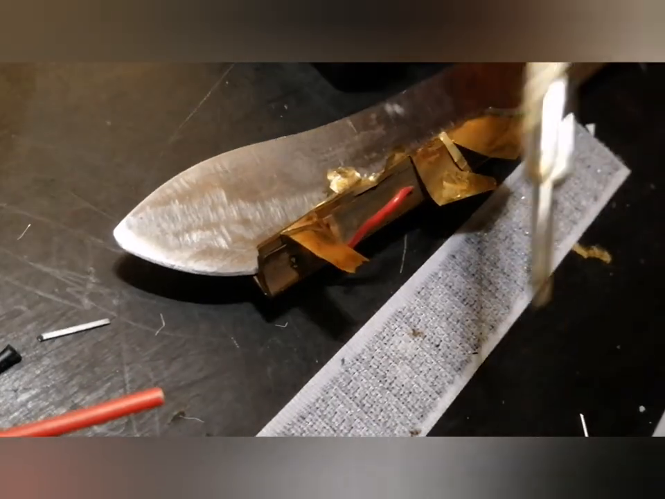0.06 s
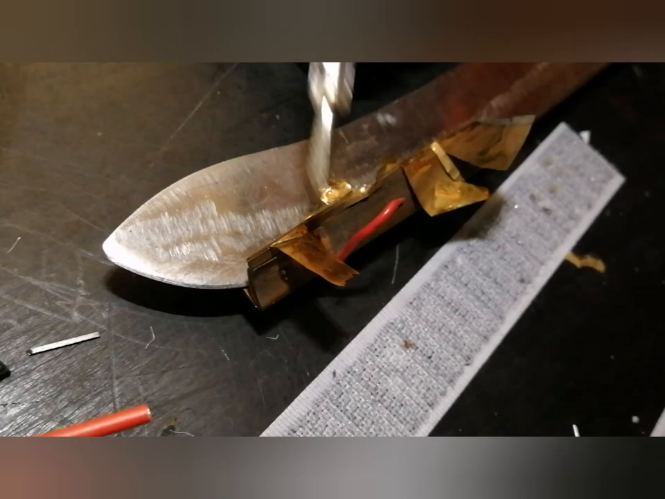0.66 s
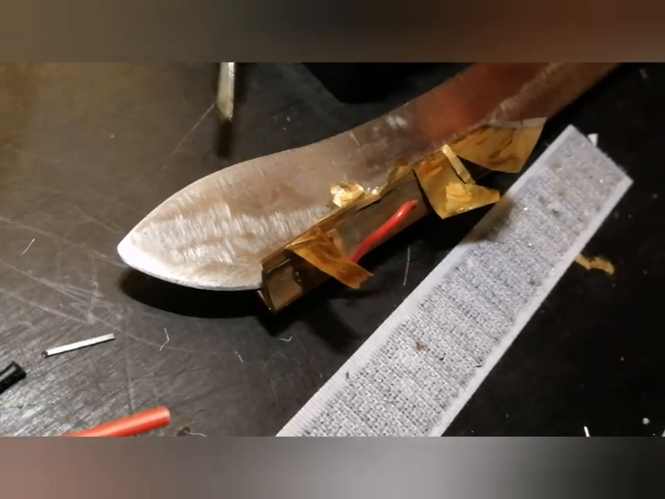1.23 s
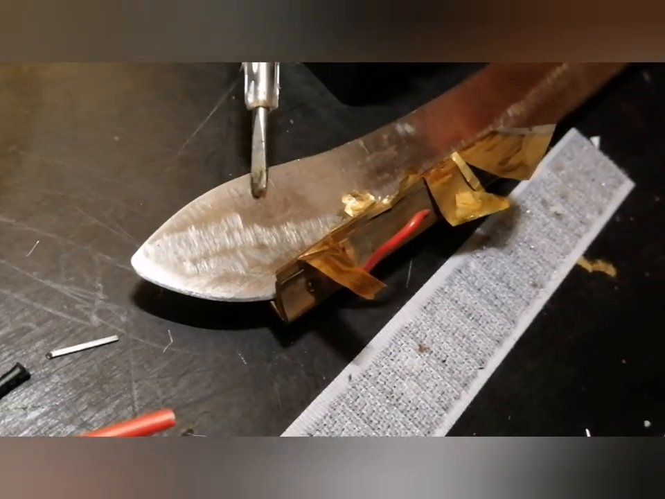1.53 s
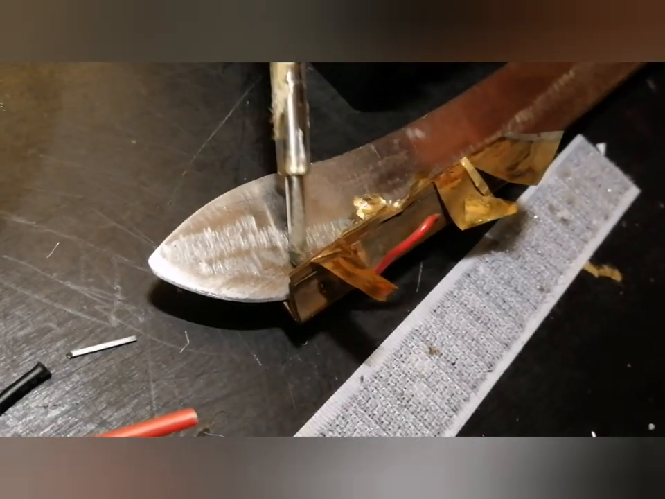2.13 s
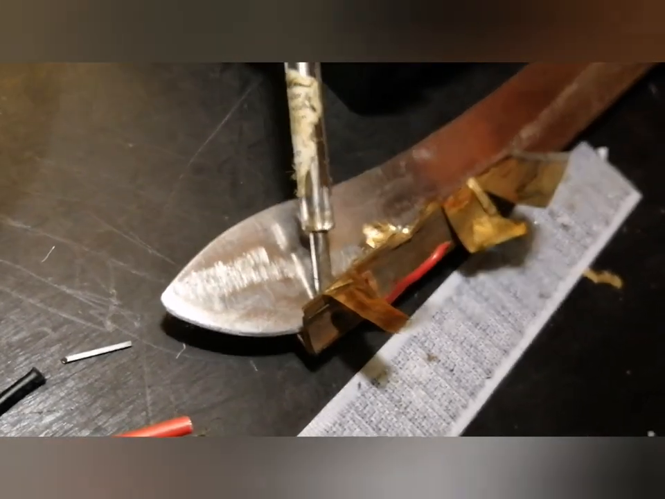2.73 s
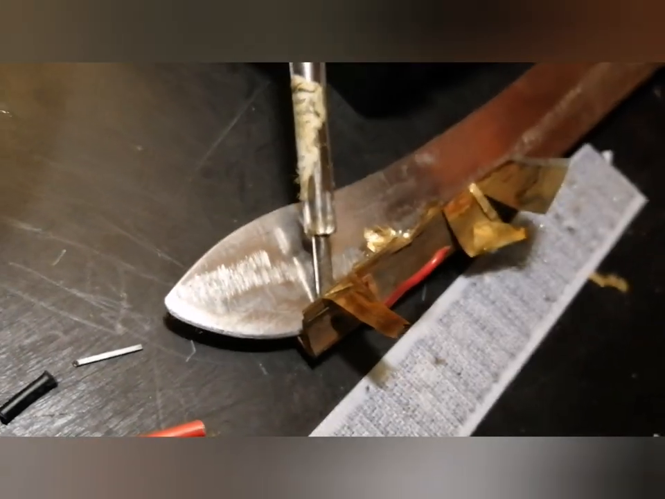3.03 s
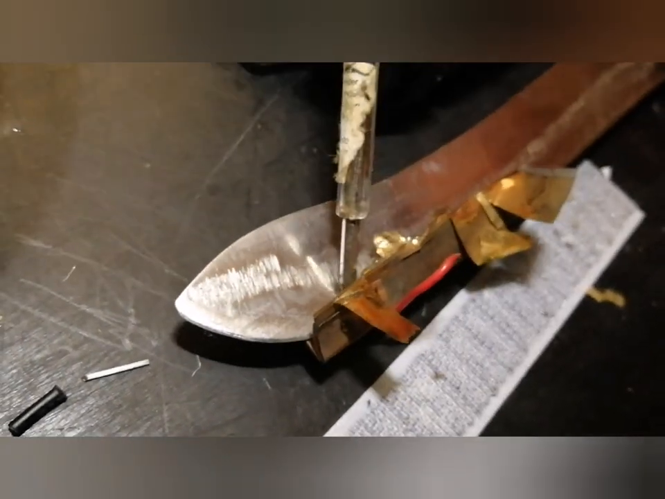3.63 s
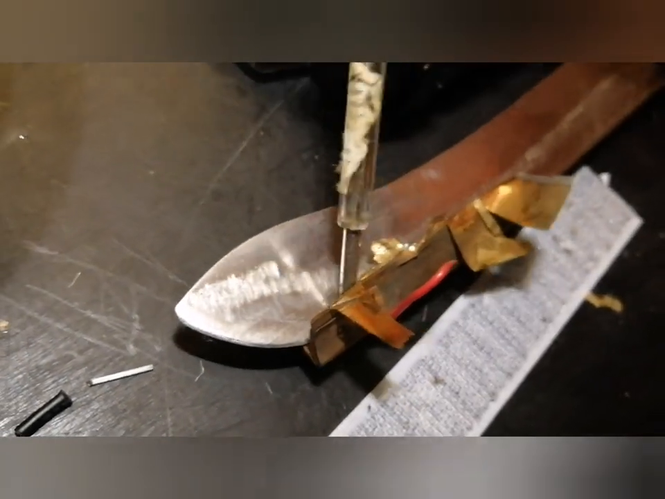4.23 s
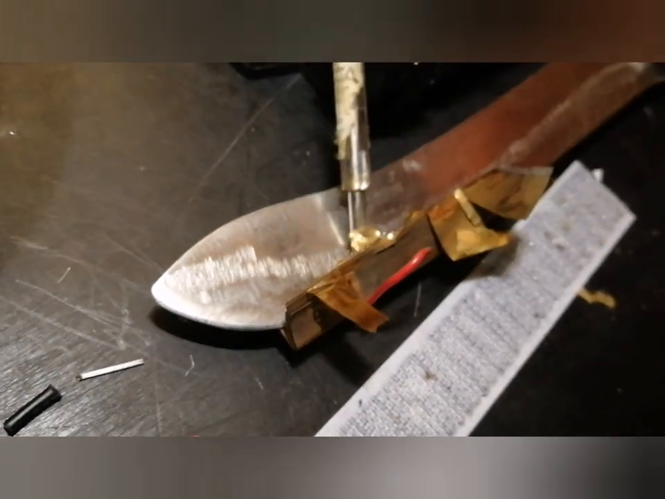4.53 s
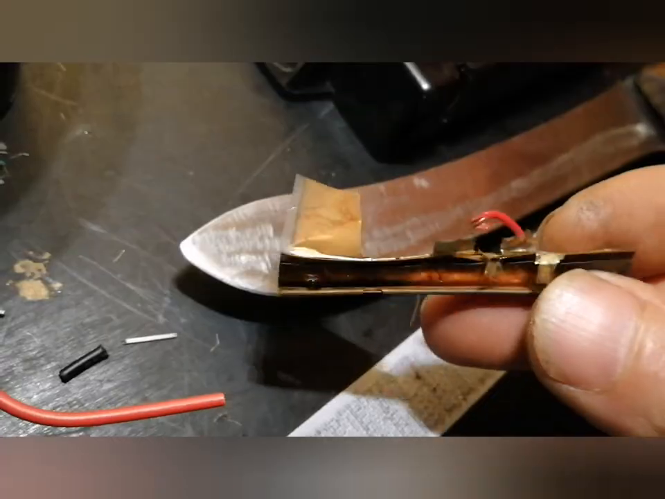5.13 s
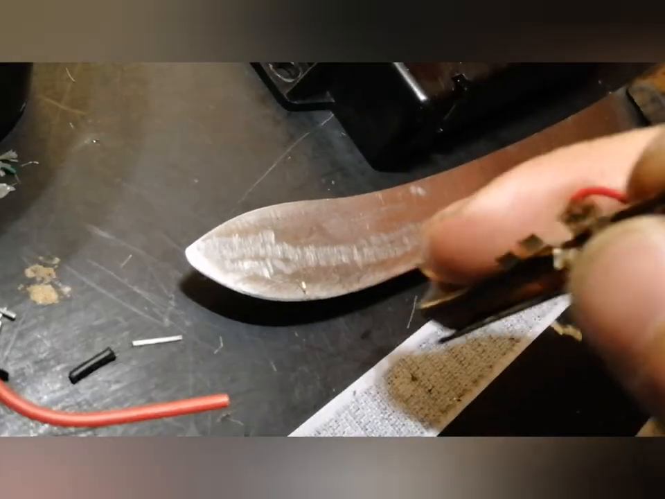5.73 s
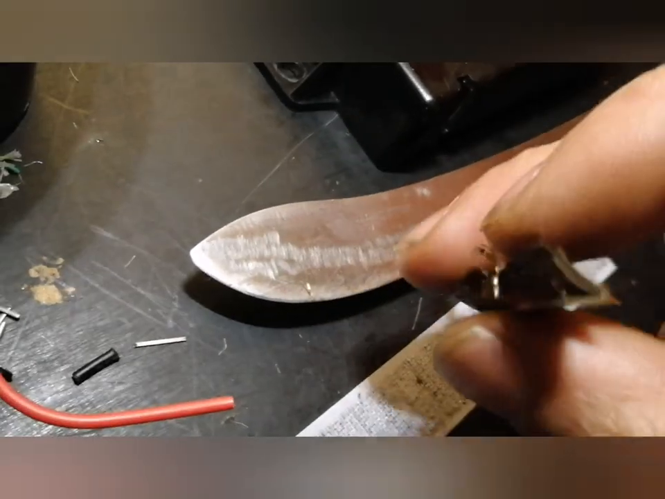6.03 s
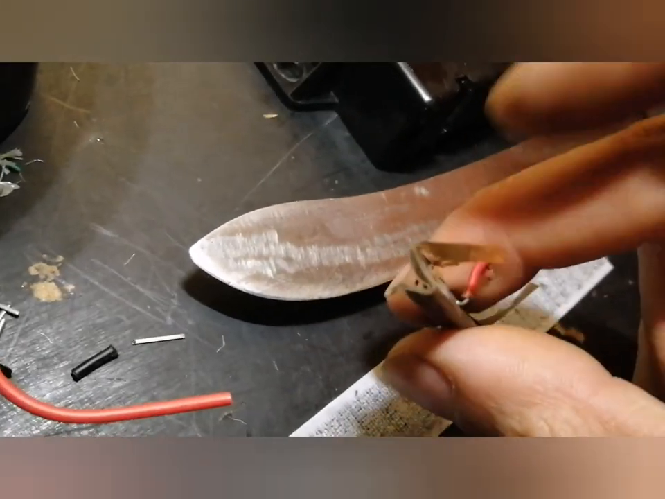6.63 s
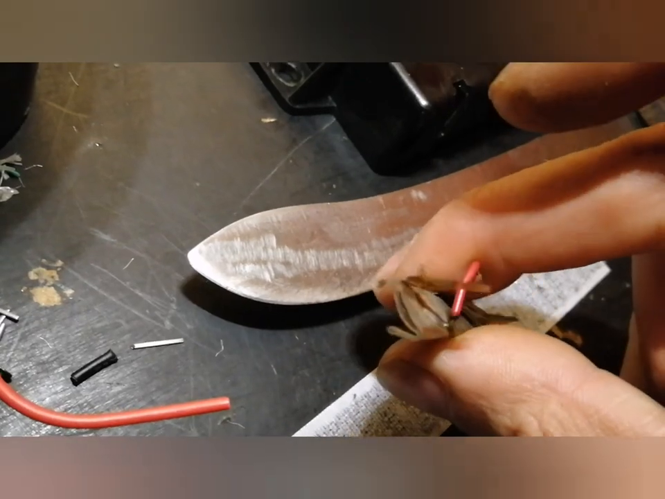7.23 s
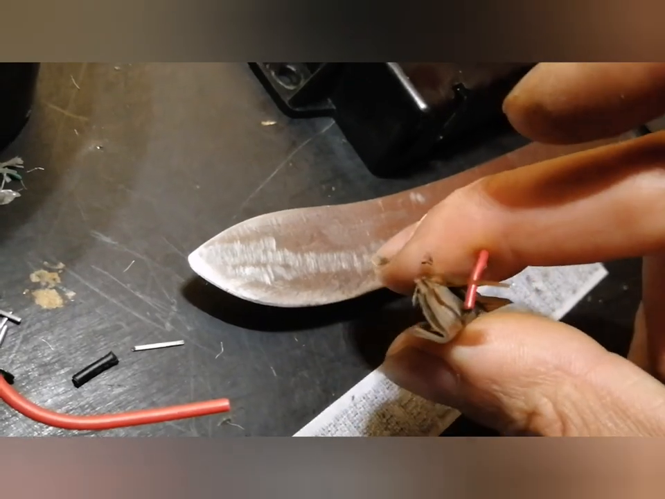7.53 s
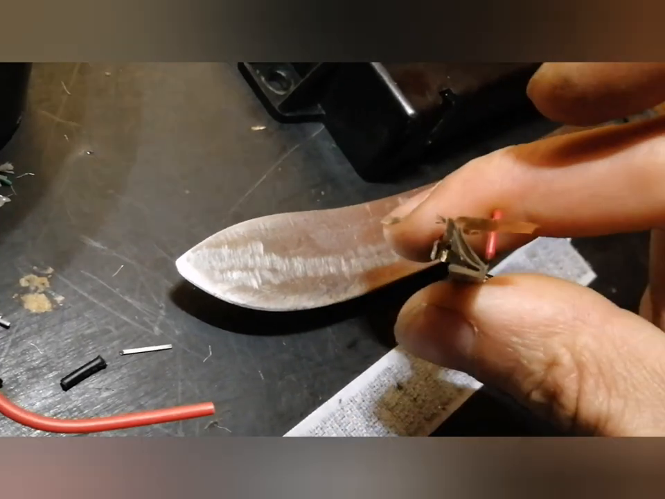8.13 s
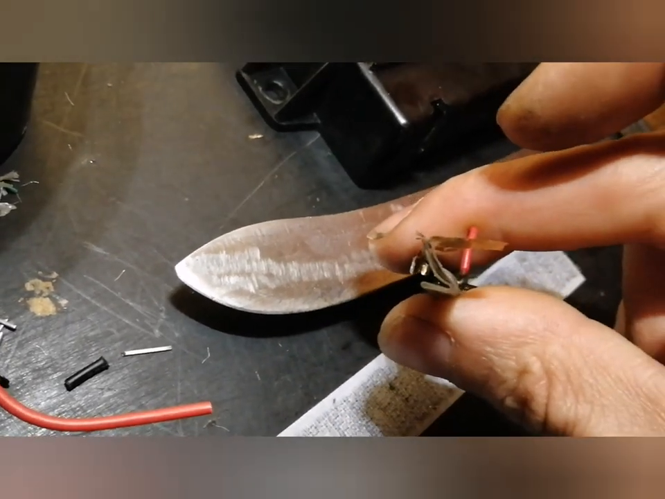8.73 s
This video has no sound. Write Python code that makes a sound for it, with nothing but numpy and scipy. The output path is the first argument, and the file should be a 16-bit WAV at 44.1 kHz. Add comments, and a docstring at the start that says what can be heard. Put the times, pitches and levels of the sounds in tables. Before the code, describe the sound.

After a faint finger rub, a steel blade knocks lightly several times on a workbench. A small screwdriver clicks against the blade and makes short, thin scrapes over steel and foil, and the work knocks again. Fingers then take up a foil-wrapped part, which crinkles and snaps before easing into soft rubs and scattered ticks. The sound is close and leans left, in a quiet room.

```python
"""A faint rub of fingers in a quiet room, then close handwork at a bench: pieces rock and knock on the
bench top while a small screwdriver scrapes thin foil against a steel blade, slips off and clicks on the
metal. Fingers then pick up the foil-wrapped part and press it: creases tick as they pop over, the foil
crinkles and skin sticks and slips. The work lies near the left microphone port; the right one is shaded."""
import sys
import numpy as np
from scipy import signal
from scipy.fft import rfft, irfft, next_fast_len
from scipy.io import wavfile
from scipy.ndimage import map_coordinates

SR = 44100
rng = np.random.default_rng(int(sys.argv[2]) if len(sys.argv) > 2 else 0)


def master(y):
    """Save y as 16-bit WAV."""
    cut = np.clip(np.atleast_2d(y).T, -1, 1)
    pcm = np.round(cut * 32767)  # scale
    wavfile.write(sys.argv[1], SR, pcm.astype(np.int16))


N = 391768
T = np.arange(SR // 3) / SR  # time within one event

# ringing modes of the bench top and of the steel blade: pitch_hz, gain_db, t60_s
BENCH_MODES = [(164.5, -6, 0.24), (202, -9, 0.19), (238.2, -3, 0.17), (277.4, 7.5, 0.044),
               (318, -0.5, 0.11)]
BLADE_MODES = [(458, -1, 0.05), (508, -6.5, 0.087), (670, -0.5, 0.069), (1257, -2.5, 0.054),
               (1494.5, 4, 0.07), (1538, -5.5, 0.059), (1657, -16, 0.078)]
# tone of a woody knock and of the foil's fizz: freq_hz, gain_db
KNOCK_EQ = [(100, -32), (350, -13), (470, 2.5), (580, -11.5), (690, 1.5), (850, 0.5), (1100, 7.5),
            (1530, 6), (1900, -6.5), (2900, -11.5), (4200, -23), (6500, -23), (8700, -19), (16000, -68)]
FIZZ_EQ = [(2000, -37), (6000, -17), (11000, 3.5), (13000, -3.5), (16000, -11.5)]
# swells of the foil's rustle in the fingers: time_s, level_db
HANDLING = [(5.05, -82.5), (5.16, -67), (5.35, -75.5), (5.52, -68), (5.68, -72.5), (5.98, -56.5),
            (6.12, -74), (6.29, -74.5), (6.96, -83), (7.87, -76.5), (8.49, -81.5), (8.88, -70)]


def amp(db):
    """Decibels to gain."""
    return 10 ** (np.asarray(db) / 20)


def unit(x, span_s=None):
    """x at rms 1, over all of it or as if its energy fell in span_s."""
    return x / np.sqrt(np.sum(x ** 2) / (span_s * SR if span_s else len(x)) + 1e-20)


def along(points, hz):
    """Read a (freq_hz, value) curve on a log frequency axis."""
    freqs, values = np.transpose(points)
    return np.interp(np.log(hz + 1), np.log(freqs + 1), values)


def fade(t, t60):
    """Exponential decay, 60 dB down at t60."""
    return np.exp(-np.log(1000) * t / t60)


def swell(rise, t60):
    """A straight rise, then a decay."""
    return np.minimum(T / rise, 1) * fade(np.maximum(T - rise, 0), t60)


def wobble(size, knots_per_s):
    """A smooth random curve."""
    knots = rng.standard_normal(int(size * knots_per_s / SR) + 4)
    return map_coordinates(knots, [np.arange(size) * knots_per_s / SR])


def add(track, start_s, x):
    """Mix x into the track."""
    part = track[round(start_s * SR):][:len(x)]
    part += x[:len(part)]


def colour(x, eq):
    """Minimum-phase EQ through (freq_hz, gain_db) points."""
    size = 2 * next_fast_len(x.shape[-1] // 2 + len(T) // 4)
    cepstrum = irfft(np.log(amp(along(eq, np.fft.rfftfreq(size, 1 / SR)))))
    cepstrum[1:size // 2] *= 2
    cepstrum[size // 2 + 1:] = 0
    return irfft(rfft(x, size) * np.exp(rfft(cepstrum)), size)[..., :x.shape[-1]]


def resonate(x, peaks):
    """x through a body's (pitch_hz, width_hz, gain_db) resonances."""
    size = next_fast_len(len(x) + len(T))
    hz = np.fft.rfftfreq(size, 1 / SR)
    body = sum((-1) ** k * amp(db) * 1j * hz * width / (pitch ** 2 - hz ** 2 + 1j * hz * width)
               for k, (pitch, width, db) in enumerate(peaks))
    return irfft(rfft(x, size) * body, size)[:len(x)]


def ring(modes, attack):
    """Damped modes, at slightly new strengths and pitches for each blow."""
    hz, db, t60 = np.transpose(modes)[:, :, None]
    strength, detune, phase = rng.standard_normal((3, len(modes), 1))
    waves = amp(db + 2 * strength) * np.sin(2 * np.pi * (hz * (1 + .005 * detune) * T + phase))
    return np.sum(fade(T, t60) * waves, axis=0) * (1 - np.exp(-T / attack))


def burst(attack, t60):
    """A brief dying puff of noise."""
    return rng.standard_normal(len(T)) * (1 - np.exp(-T / attack)) * fade(T, t60)


def grit(size, slips_per_s, spread_db, hiss):
    """Friction: tiny slips of uneven strength over a smooth hiss."""
    slips = (rng.random(size) < slips_per_s / SR) * rng.choice([-1, 1], size)
    strength = amp(spread_db * rng.uniform(-1, 1, size))
    return unit(unit(slips * strength) + hiss * rng.standard_normal(size))


def hush(level_db=-73):
    """Faint room hiss, centred in the bass and wider above."""
    hiss_eq = [(40, -24), (100, -18), (170, -19), (250, -22), (320, -20), (430, -26), (1200, -26),
               (5000, -30), (8800, -29.5), (11000, -33.5), (16000, -34.5)]  # tone of the hiss: freq_hz, gain_db
    likeness = [(60, 1), (300, 0.6), (600, 0), (1500, 0.44)]  # how alike the ports hear it: freq_hz, correlation
    balance = [(300, 1.5), (800, 0.5), (2000, 3), (6000, 0), (7400, 2.5), (8500, -2), (9700, 0.5),
               (11000, 0)]  # its lean to the left: freq_hz, left_minus_right_db
    hz = np.fft.rfftfreq(N, 1 / SR)
    mid, side = rfft(rng.standard_normal((2, N))) * amp(along(hiss_eq, hz))
    side *= np.tan(np.arccos(np.clip(along(likeness, hz), 0, 1)) / 2)
    lean = amp(along(balance, hz) / 2)
    pair = irfft(np.array([(mid + side) * lean, (mid - side) / lean]), N)
    return amp(level_db) * pair / pair.std()


def rumble(gain_db=3):
    """The room's deep rumble drifts slowly and is the same at both ports."""
    drift = [(0.0, -76), (3.26, -73.5), (4.1, -79), (8.66, -77), (8.88, -80)]  # rise and fall of the rumble: time_s, level_db
    rumble_eq = [(12, -15.5), (25, -2), (37, -8), (50, 2), (70, -4), (100, -20.5), (200, -24.5),
                 (600, -103)]  # its tone: freq_hz, gain_db
    drift_db = np.interp(np.arange(N) / SR, *np.transpose(drift))
    return amp(gain_db + drift_db) * unit(colour(rng.standard_normal(N), rumble_eq))


def fingers(rustle_db=1, crinkle_db=2, clump_db=3):
    """Skin sticks and slips on the part, duller and hollower with more grip; foil crinkles in clumps."""
    # finger slides: start_s, rise_s, t60_s, level_db, grip (0 brushing foil, 1 pressing on the body)
    rubs = [(.03, 0.023, 0.98, -61, 0.46), (5.264, 0.038, .02, -54, 0.075), (5.651, 0.016, .43, -54.5, .3),
            (5.855, 0.058, .11, -48, 0), (5.905, .008, 0.13, -32, 0.034), (5.927, 0.0066, 0.2, -38.5, 0.94),
            (6.103, 0.023, 0.089, -42.5, 0.93), (6.717, .01, 0.088, -67.5, 1),
            (6.883, 0.0032, 0.16, -65, 0.86), (7.312, 0.0041, 0.1, -55.5, 0.52),
            (7.441, 0.007, 0.61, -58.5, 0.73), (7.679, .03, 0.46, -65.5, 0.78),
            (7.862, 0.0067, 0.95, -63, 0.92), (8.167, 0.004, 0.14, -55, 0.45)]
    held_body = [(373, 48, 4.5), (558, 42, 1), (1250, 133, 8.5), (1680, 280, -3), (2350, 540, 2.5),
                 (3070, 320, 6), (3830, 300, -2.5), (4370, 67, 3), (6250, 320, -31)]  # resonances of the held part: pitch_hz, width_hz, gain_db
    crinkle_eq = [(500, -52.5), (2500, -12.5), (6500, -19), (7500, -9), (8200, -6), (9500, -3.5),
                  (10500, -14.5), (12000, -26), (16000, -32)]  # tone of rustling foil: freq_hz, gain_db
    out = np.zeros(N)
    for start, rise, t60, db, grip in rubs:
        slide = swell(rise, t60)
        slips = slide * grit(len(T), slips_per_s=1200, spread_db=10, hiss=.5)
        rustle = amp(rustle_db) * unit(colour(slips, crinkle_eq))
        body = amp(-19 + 23 * grip) * unit(resonate(slips, held_body))
        fizz = amp(3 - 34 * grip) * unit(colour(slips, FIZZ_EQ))
        add(out, start, slide.std() * amp(db) * (rustle + body + fizz))
    crinkle = grit(N, slips_per_s=500, spread_db=12, hiss=.8)
    crinkle *= amp(clump_db * wobble(N, knots_per_s=45))
    return out + amp(crinkle_db + handling_db(np.arange(N) / SR)) * unit(colour(crinkle, crinkle_eq))


def handling_db(time_s):
    """How loudly the foil rustles in the fingers; silent before they take it."""
    return np.interp(time_s, *np.transpose(HANDLING), left=-120)


def knocks(hard_db=-36, blade_db=-6, rock_s=.009, rock_db=-8, thud_db=-46, skid_db=-20.5):
    """The work drops on the bench, rocks onto its other edge and skids; soft knocks are dull thuds."""
    drops = [(1.2664, -36.5), (1.302, -34), (1.351, -51), (1.398, -52), (1.412, -42), (1.4251, -36),
             (1.5407, -34), (2.463, -66), (2.584, -66), (3.7044, -53.5), (3.811, -64.5), (4.695, -35),
             (4.7187, -47.5), (4.771, -53), (4.7934, -41.5), (4.856, -57), (4.962, -67), (7.263, -64)]  # the work meets the bench: start_s, level_db
    out = np.zeros(N)
    for start, db in drops:
        force_db = db - hard_db
        contact = unit(burst(attack=0.00055, t60=0.029))
        contact[0] += 0.68 * np.sqrt(len(T))  # the first hard touch
        add(contact, rock_s, amp(rock_db) * unit(burst(attack=0.00071, t60=0.023)))
        body = unit(colour(contact, KNOCK_EQ)) + amp(blade_db) * unit(ring(BLADE_MODES, attack=0.0007))
        body = colour(body, [(800, 0), (2000, 0.33 * force_db)])  # less force, less treble
        add(out, start, amp(db) * unit(body, 0.023))
        thud = ring(BENCH_MODES, attack=0.0026)
        add(out, start, amp(thud_db + 0.64 * force_db) * unit(thud, 0.015))
        skid = swell(rise=0.011, t60=0.22) * grit(len(T), slips_per_s=300, spread_db=12, hiss=.4)
        add(out, start, amp(db + skid_db) * unit(colour(skid, KNOCK_EQ), 0.023))
    return out


def taps(hard_db=-28, rebound_s=0.0086, shaft_db=-6, wood_db=-3, note_db=-44.5, bench_db=-8):
    """The tip clicks on steel and rebounds once; a harder tap rebounds more and makes the blade sing."""
    strikes = [(1.4175, -30.5, -45), (2.2431, -34.5, -43.5), (2.7028, -49, -56.5), (3.2713, -42.5, -46.5),
               (3.4922, -46, -52), (3.5203, -41, -49.5), (3.6196, -26.5, -45.5), (3.8523, -39.5, -48.5),
               (4.3124, -26.5, -45.5), (4.6061, -41, -78)]  # the tip hits the blade: start_s, click_db, clack_db
    click_eq = [(300, -42), (2000, -22), (2700, -20.5), (3200, -6), (3700, -13.5), (4200, -10.5),
                (6000, -7.5), (7300, -4.5), (8400, 3.5), (9600, 0.5), (10800, -8.5), (14000, -16),
                (16000, -21)]  # tone of steel on steel: freq_hz, gain_db
    # modes of the screwdriver shaft, and the blade's singing note: pitch_hz, gain_db, t60_s
    shaft_modes = [(4780, -10.5, 0.049), (5020, 4.5, 0.02), (6435, 4.5, 0.048), (6660, 1, 0.056),
                   (6600, -6.5, 0.033), (9660, -4, 0.017), (9050, 4.5, 0.026)]
    blade_note = [(1128, 0, 0.072)]
    out = np.zeros(N)
    for start, click_db, clack_db in strikes:
        force_db = click_db - hard_db
        contact = burst(attack=0.00087, t60=0.024)
        add(contact, rebound_s, amp(-5 + 0.27 * force_db) * burst(attack=0.00015, t60=0.014))
        click = unit(colour(contact, click_eq)) + amp(shaft_db) * unit(ring(shaft_modes, attack=0.00051))
        clack = unit(ring(BLADE_MODES, attack=0.0025)) + amp(wood_db) * unit(colour(contact, KNOCK_EQ))
        add(out, start, amp(click_db) * unit(click, 0.021) + amp(clack_db) * unit(clack, 0.024))
        add(out, start, amp(note_db + 1.53 * force_db) * unit(ring(blade_note, attack=0.012), 0.043))
        add(out, start, amp(clack_db + bench_db) * unit(ring(BENCH_MODES, attack=0.0068), 0.026))
    return out


def scrapes(uneven_db=2, blade_db=-5, fizz_db=-19.5):
    """The tip drags with uneven pressure: on steel it rasps and sings, in foil it thins to a fizz."""
    # strokes of the tip: start_s, end_s, level_db, bite (0 gliding on steel, 1 dragging foil)
    strokes = [(1.58, 1.636, -49.5, 0.2), (2.308, 2.376, -57.5, 0), (3.121, 3.165, -66.5, 0.1),
               (3.2, 3.286, -57, 0), (3.422, 3.473, -53.5, 0), (3.596, 3.617, -56.5, 1),
               (4.277, 4.336, -51.5, 0.32), (4.345, 4.45, -55, 0.46), (4.455, 4.573, -55, 0.88),
               (4.593, 4.642, -51.5, 0.44), (4.643, 4.775, -60.5, 0.47), (4.793, 4.855, -54, 0)]
    # resonances of the bright rasp and of the blade under the tip: pitch_hz, width_hz, gain_db
    rasp_peaks = [(3150, 320, -7), (3900, 500, -6.5), (4930, 710, -2.5), (6240, 200, 4.5), (7070, 800, 3.5),
                  (8040, 1530, 4), (9360, 960, 6.5)]
    blade_peaks = [(200, 92, -9), (453, 86, -3.5), (773, 54, -4), (1134, 35, 7), (1506, 42, 4.5),
                   (1700, 97, -6), (2990, 115, -10)]
    out = np.zeros(N)
    for start, end, db, bite in strokes:
        length = end - start
        arch = np.sqrt(np.abs(np.sin(np.pi * np.minimum(T / length, 1))))
        pressure = arch * amp(uneven_db * wobble(len(T), knots_per_s=70.5))
        slips = pressure * grit(len(T), slips_per_s=2000, spread_db=12, hiss=.8)
        rasp = colour(resonate(slips, rasp_peaks), [(5000, -4 * bite), (7000, 0)])
        add(out, start, amp(db) * unit(rasp, length))
        add(out, start, amp(db + blade_db - 14.5 * bite) * unit(resonate(slips, blade_peaks), length))
        add(out, start, amp(db + fizz_db + 24 * bite) * unit(colour(slips, FIZZ_EQ), length))
    return out


def bumps():
    """Soft bumps on the bench: one low dying tone under a brief contact."""
    blows = [(2.83, -64, 0.065, 156, -80), (3.281, -48, 0.15, 168, -44.5), (6.169, -56.5, 0.074, 46.5, -67),
             (8.519, -43, 0.012, 125, -60)]  # each bump: start_s, tone_db, t60_s, pitch_hz, contact_db
    out = np.zeros(N)
    for start, tone_db, t60, hz, contact_db in blows:
        add(out, start, amp(tone_db) * 2 * np.sin(2 * np.pi * hz * T) * fade(T, t60))
        contact = colour(burst(attack=0.00023, t60=0.0027), KNOCK_EQ)
        add(out, start, amp(contact_db) * unit(contact, 0.0096))
    return out


def crease(ping_db, snap_db, pitch_hz=9230, scatter=0.026, width_hz=1000):
    """A foil crease takes about a millisecond to pop over and pings at its own pitch."""
    snap_eq = [(200, -31), (1200, -15), (2500, -11), (5000, -1.5), (7000, 2.5), (11000, 3), (14000, -1.5),
               (16000, -9.5)]  # tone of the pop: freq_hz, gain_db
    port_eq = [(3000, -16), (6500, -6.5), (7800, -2), (9800, -5), (11000, -8), (16000, -20)]  # the treble band that the left port favours: freq_hz, gain_db
    give = np.minimum(T / .001, 1) ** 2
    pop = colour(give * burst(attack=0.00041, t60=0.02), snap_eq)
    ping_hz = pitch_hz * (1 + scatter * rng.standard_normal())
    ping = colour(resonate(pop, [(ping_hz, width_hz, 0)]), port_eq)
    return amp(ping_db) * unit(ping, 0.0035) + amp(snap_db) * unit(pop, 0.0035)


def ticks(faint_per_s=10, over_rustle_db=14.5, spread_db=3.5):
    """Loud creases, and small ones that give at chance moments while the foil is handled."""
    loud_creases = [(4.4861, -46, -34), (4.56, -24, -34.5), (4.718, -32.5, -32.5), (4.862, -44, -51),
                    (5.138, -46.5, -60), (5.161, -49, -45), (5.184, -46.5, -51), (5.238, -53, -50.5),
                    (5.306, -36, -54), (5.512, -42.5, -50), (5.524, -37.5, -42), (5.589, -47, -54),
                    (5.618, -43, -48), (5.631, -32, -38), (5.811, -36, -47), (5.816, -31, -50),
                    (5.834, -24.5, -37.5), (5.914, -20, -34.5), (5.928, -27, -31), (6.123, -42, -57),
                    (6.38, -41.5, -50.5), (6.827, -68, -55), (7.437, -39.5, -49), (7.67, -35, -42),
                    (8.414, -54, -45.5), (8.788, -66, -49.5)]  # snaps in the foil: start_s, ping_db, snap_db
    out = np.zeros(N)
    for start, ping_db, snap_db in loud_creases:
        add(out, start, crease(ping_db, snap_db - 2))
    for slot in np.arange(HANDLING[0][0], HANDLING[-1][0], 1 / faint_per_s):
        start = slot + rng.random() / faint_per_s
        db = handling_db(start) + over_rustle_db + spread_db * rng.standard_normal()
        add(out, start, crease(db, db - 1))
    return out


def room(x, onset_s=0.0034):
    """A short diffuse tail, different at each port."""
    decay = [(150, 0.32), (1000, 0.18), (8000, 0.13), (16000, 0.081)]  # reverb time: freq_hz, t60_s
    hz, t, bands = signal.stft(rng.standard_normal((2, len(T))), SR, nperseg=256)
    _, tail = signal.istft(bands * fade(t, along(decay, hz)[:, None]), SR, nperseg=256)
    tail = tail[:, :len(T)] * np.minimum(T / onset_s, 1)
    return signal.fftconvolve(x[None], tail / np.linalg.norm(tail[0]), axes=1)[:, :N]


def far_port(x, delay_s):
    """The right port hears the bass directly, the treble also scattered off things on the bench."""
    scatter = unit(burst(attack=0.00097, t60=0.056), 1 / SR)
    treble = colour(x, [(300, -24), (1200, -9), (4000, -3)])
    scattered = signal.fftconvolve(treble, scatter)[:N]
    direct = colour(x, [(1200, 0), (4000, -3)])
    return np.roll(direct + scattered, round(delay_s * SR))


def scene(left_room_db=-15, right_room_db=-10):
    """Tool and hand sound close on the left, shaded and roomier on the right, over the room tone."""
    shade_eq = [(290, 0), (450, -4.5), (800, -14), (1200, -9), (1600, -3), (2500, -7), (5000, -9.5),
                (6300, -13), (8500, -24), (10500, -20.5), (13500, -1.5), (16000, -15.5)]  # shading of the far port: freq_hz, gain_db
    tool = taps() + knocks() + bumps() + scrapes()
    hand = ticks() + fingers()
    left_tail, right_tail = room(tool + hand)
    left = tool + hand + amp(left_room_db) * left_tail
    right = far_port(tool, delay_s=0) + far_port(hand, delay_s=.00058) + amp(right_room_db) * right_tail
    return np.array([left, colour(right, shade_eq)]) + hush() + rumble()


def record(dry, top_hz=16200):
    """The recorder rolls off steeply at its band limit."""
    hz = np.fft.rfftfreq(N, 1 / SR)
    return irfft(rfft(dry) / (1 + (hz / top_hz) ** 120), N)


dry = scene()
out = record(dry)
master(out)
```